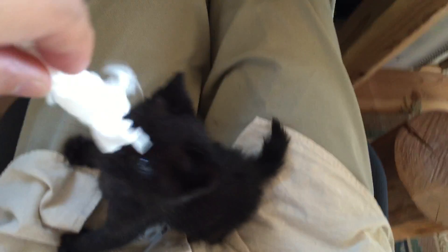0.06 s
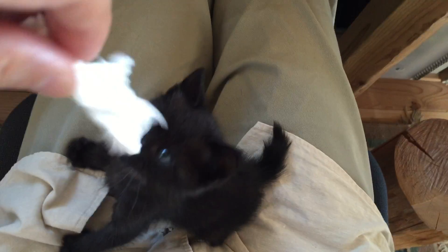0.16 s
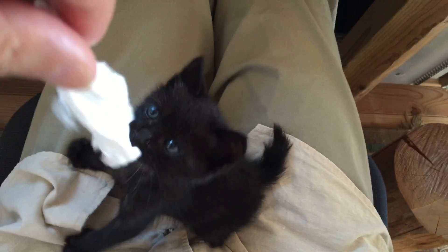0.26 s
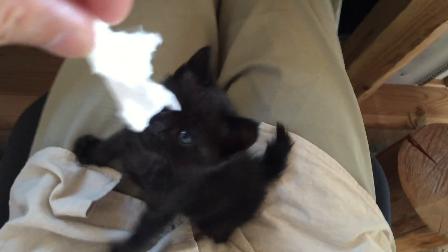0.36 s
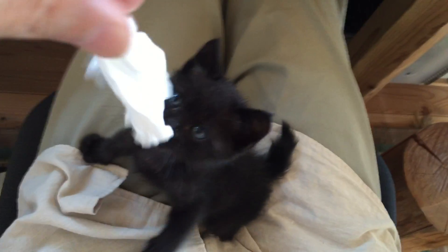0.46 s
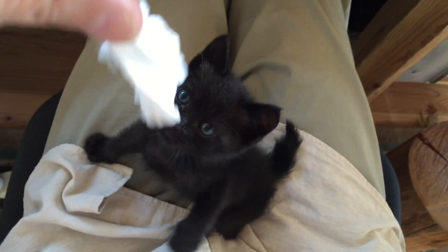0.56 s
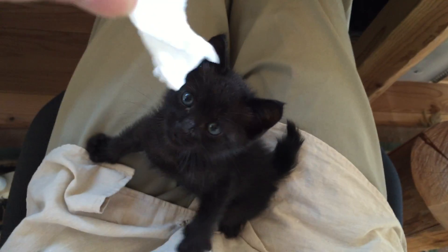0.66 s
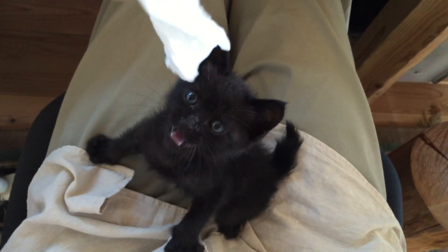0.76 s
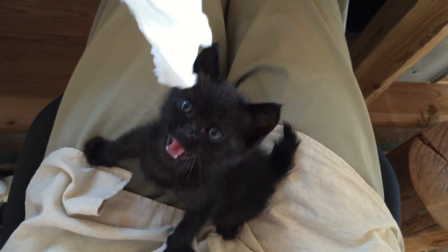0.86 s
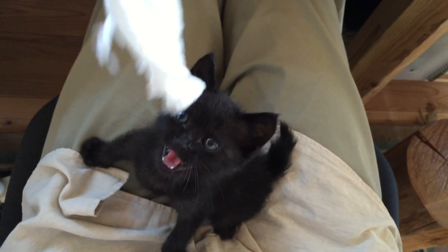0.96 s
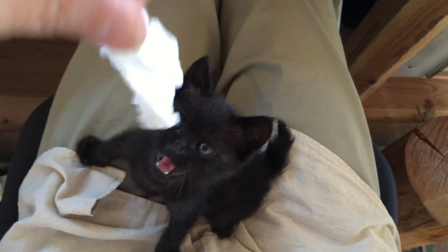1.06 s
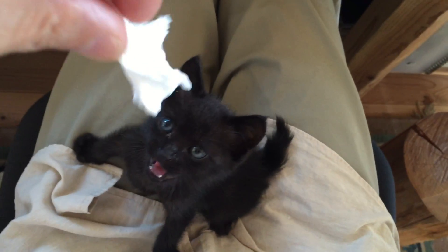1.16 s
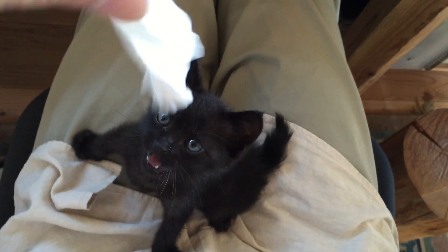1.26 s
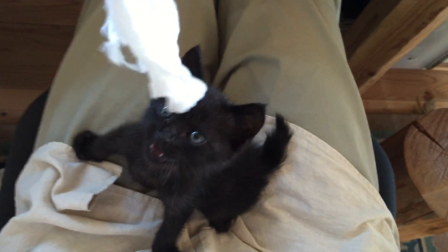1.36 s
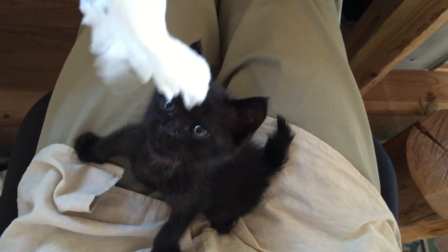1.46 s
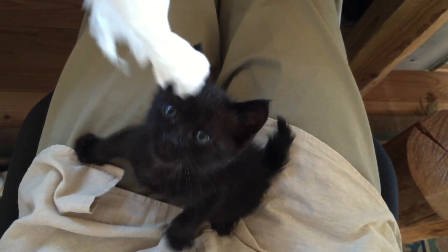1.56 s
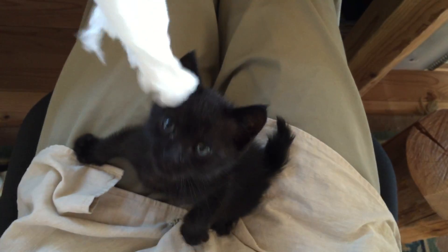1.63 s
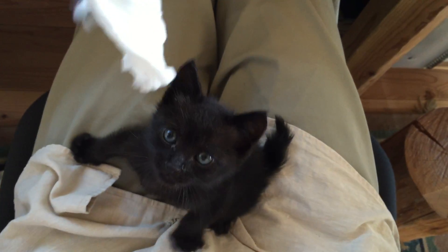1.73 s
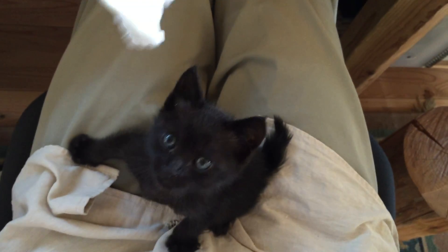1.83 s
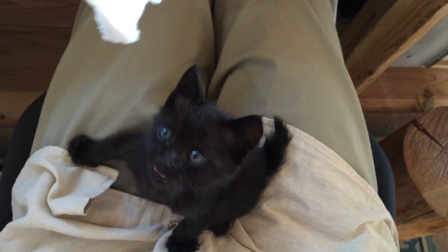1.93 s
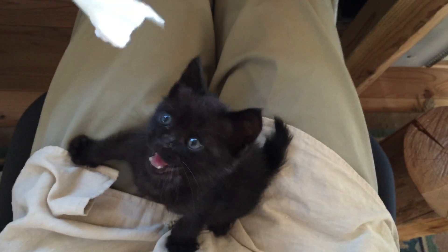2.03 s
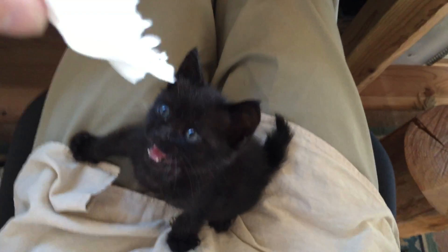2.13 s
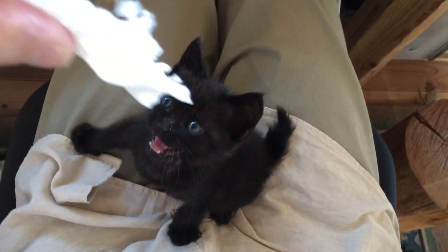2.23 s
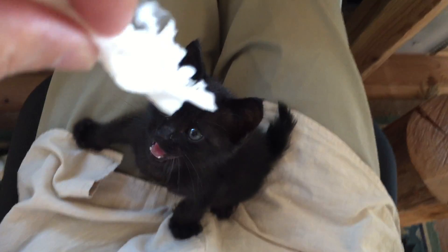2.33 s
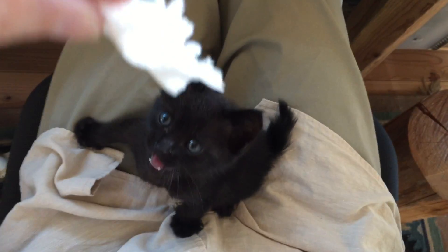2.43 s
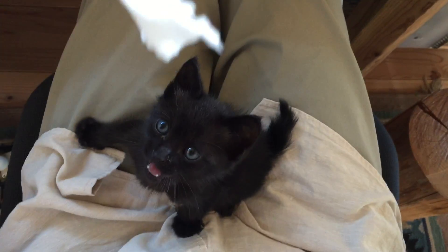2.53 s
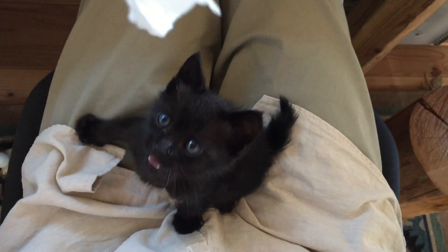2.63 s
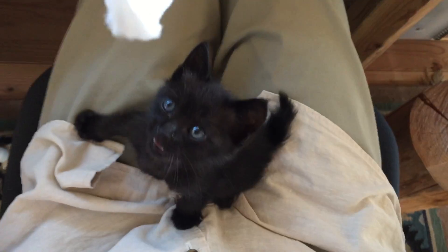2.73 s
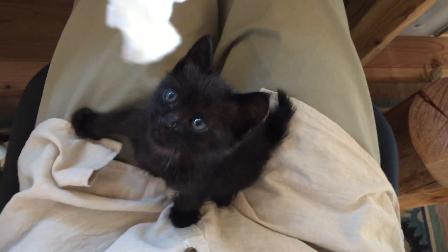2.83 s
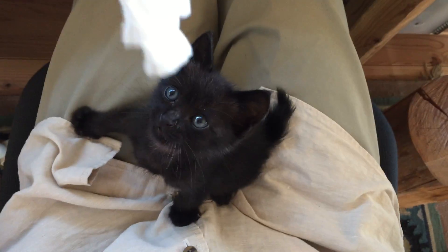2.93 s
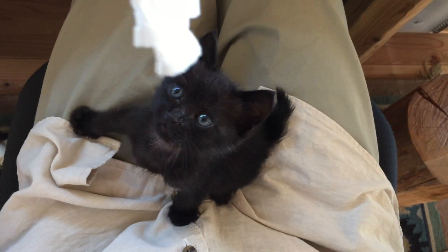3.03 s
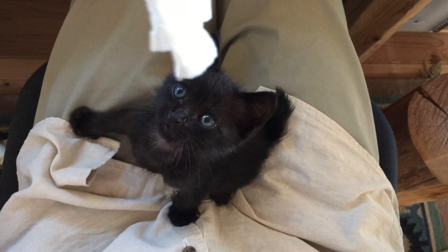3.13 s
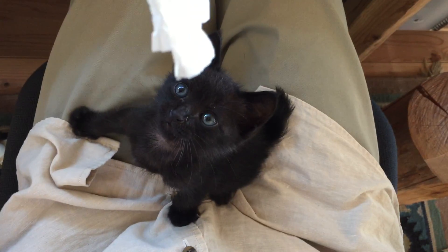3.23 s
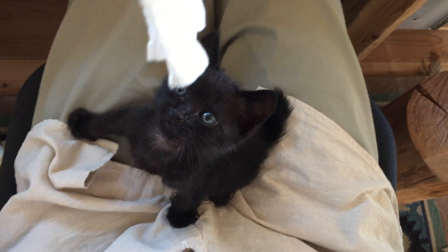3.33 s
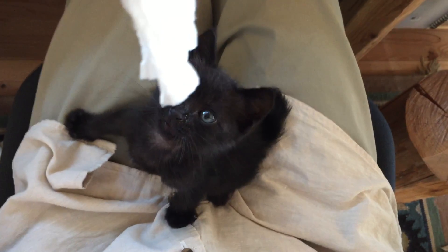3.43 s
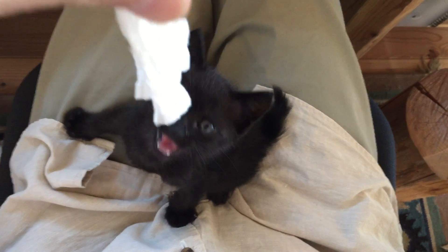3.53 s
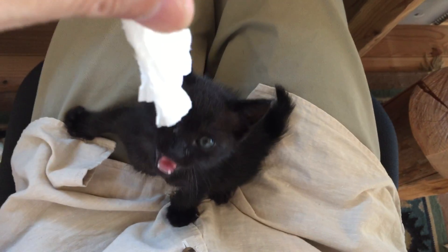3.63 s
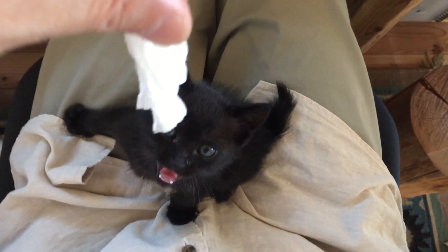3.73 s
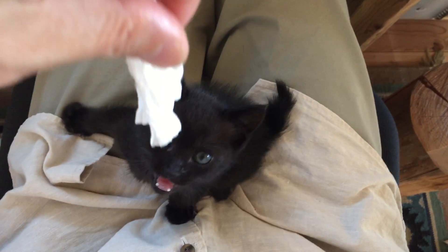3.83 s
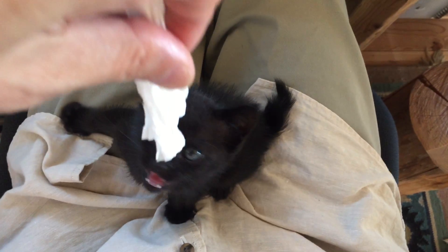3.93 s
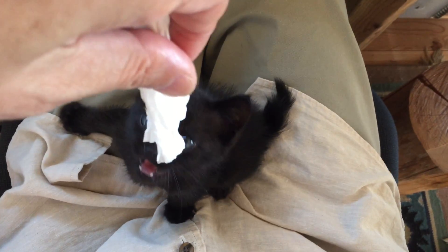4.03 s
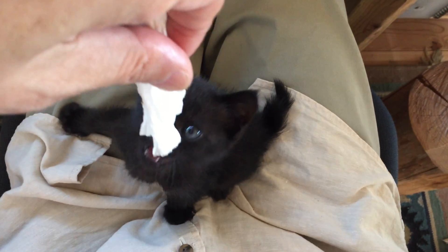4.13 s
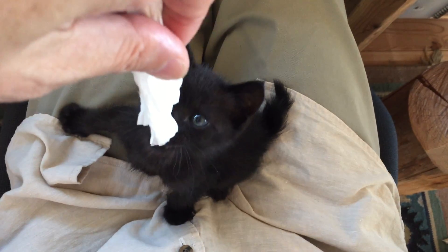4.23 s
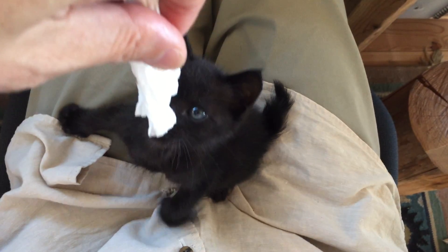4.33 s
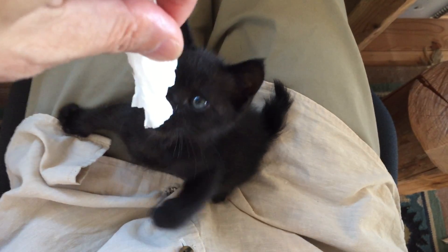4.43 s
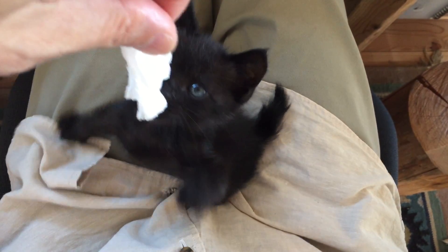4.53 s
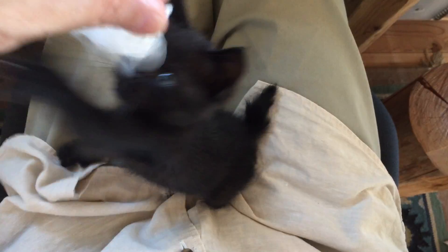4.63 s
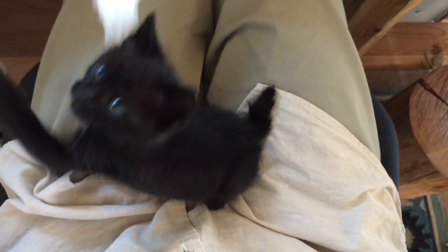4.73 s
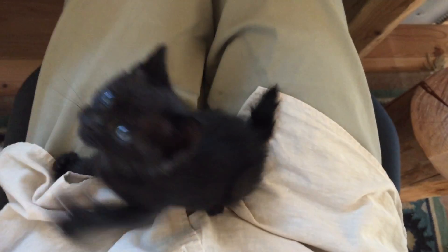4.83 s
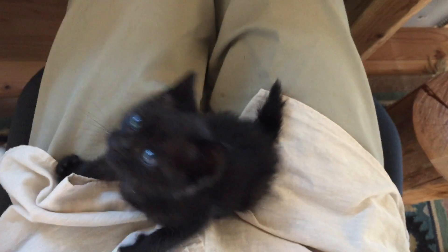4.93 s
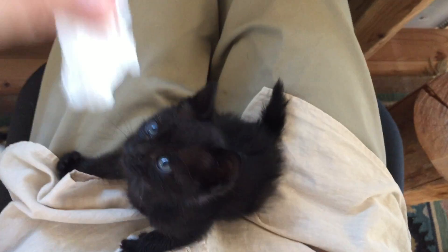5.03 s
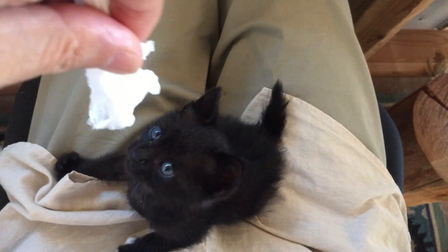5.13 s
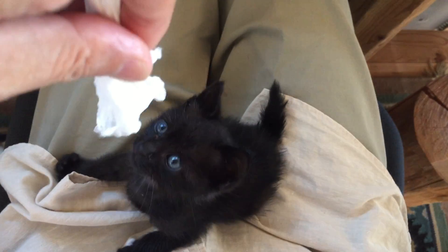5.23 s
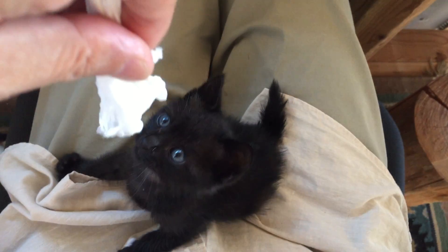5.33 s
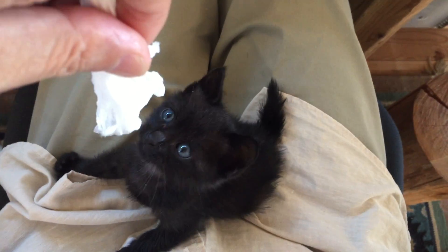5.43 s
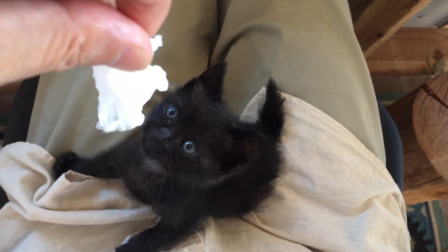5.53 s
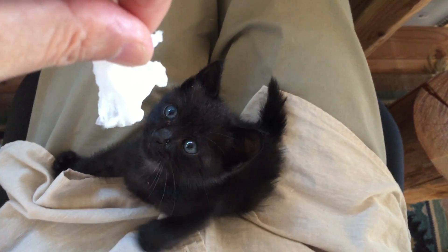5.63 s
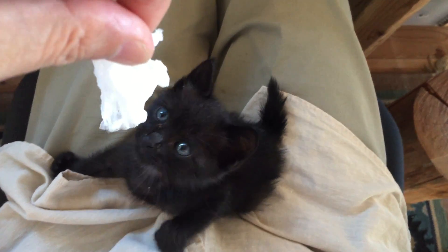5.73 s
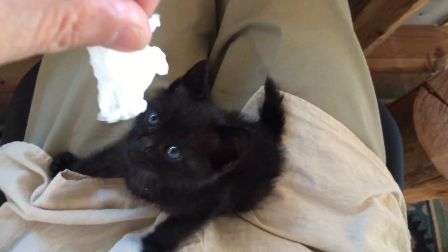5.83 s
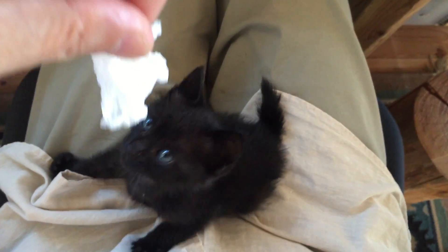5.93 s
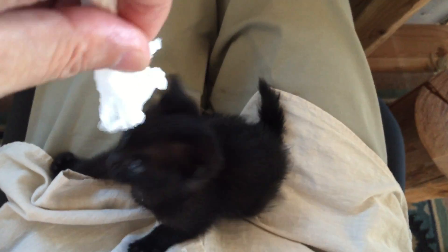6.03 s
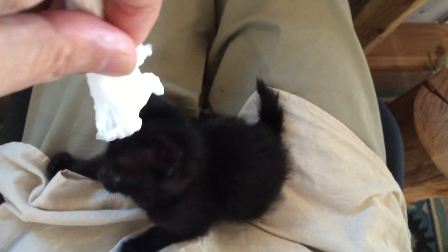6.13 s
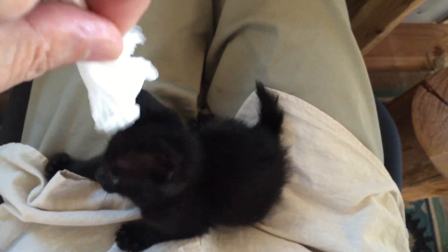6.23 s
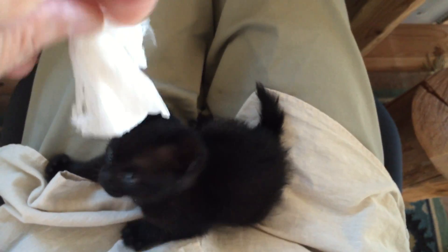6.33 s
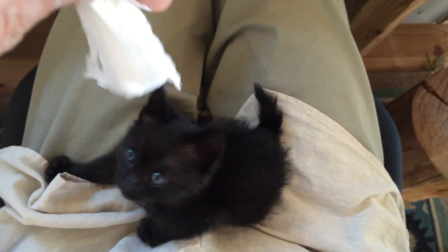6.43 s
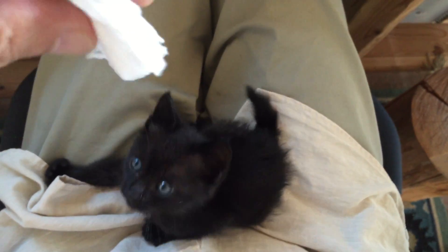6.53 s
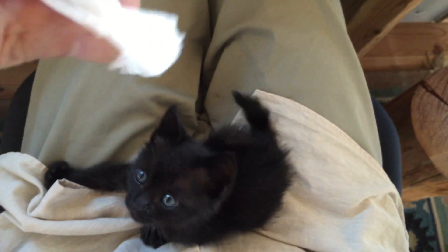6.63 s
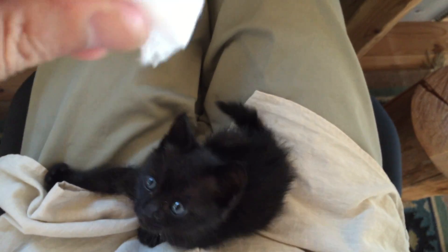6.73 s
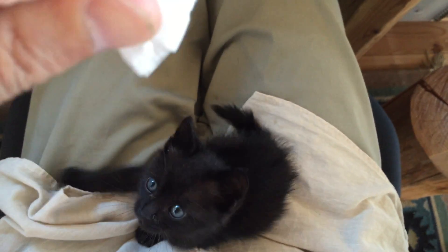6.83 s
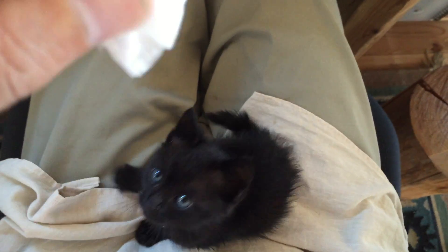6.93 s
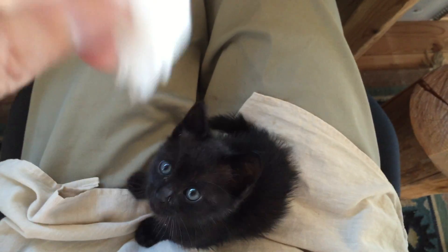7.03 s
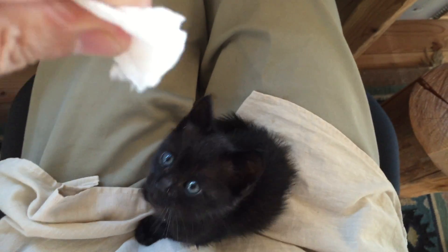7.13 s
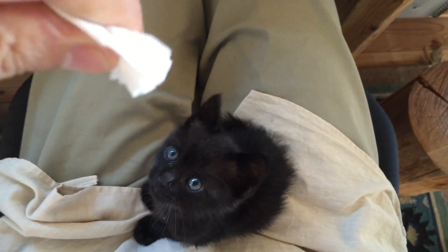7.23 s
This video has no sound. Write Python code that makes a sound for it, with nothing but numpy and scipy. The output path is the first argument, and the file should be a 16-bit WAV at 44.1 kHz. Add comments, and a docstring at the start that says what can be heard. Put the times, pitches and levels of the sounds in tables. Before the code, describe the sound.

A young kitten is heard close to the microphone in a quiet room, over soft room air and faint low hums. At about 0.8 seconds it gives a thin, high, slightly raspy mew that rises gently and drops away by 1.4. A second, slightly softer mew runs from 2.1 to 2.7 seconds. Tiny wet lip smacks come before and after these calls. At 3.6 seconds comes the loudest cry, higher and wide-mouthed, climbing, holding and sliding down to end near 4.3. A faint rustle of cloth then builds as the kitten moves on a lap, and a paw lands with a soft, dull thump at 4.7 seconds. From about 6 seconds, pads and claws lightly tap, brush and scratch on trouser fabric, with three quick snags around 6.9 seconds and a few faint scratches until about 7.3. All the movement is much quieter than the mews.

```python
"""A kitten on a lap, close to a phone in a quiet room, gives two small mews (0.8 s, 2.1 s), then a
louder, wide-mouthed cry (3.6 s). Each is vocal-fold pulses and breath, shaped by the throat and a mouth
that opens and shuts, with wet lip smacks around it. Then it scrambles after a dangled tissue: a paw
lands with a soft thump (4.7 s), and from about 6 s pads and claws tap, brush and snag on trouser cloth.
Under it all lie room air, faint hums and the rustle of the lap."""
import sys
import numpy as np
from scipy import signal
from scipy.fft import rfft, irfft, next_fast_len
from scipy.io import wavfile
from scipy.ndimage import uniform_filter1d

SR = 44100
rng = np.random.default_rng(int(sys.argv[2]) if len(sys.argv) > 2 else 0)


def int16_out(signal):
    """Quantize to a 16-bit WAV file."""
    q = np.round(np.clip(np.atleast_2d(signal).T, -1, 1) * 32767)
    wavfile.write(sys.argv[1], SR, q.astype(np.int16))


N = 320607
TIME = np.arange(N) / SR
CEILING_HZ = 15950

# The melody of each mew. Each row: time in seconds, pitch in Hz.
PITCH_1 = [(0.8, 600), (0.808, 649), (0.824, 680), (0.838, 640), (0.852, 680.5), (0.896, 673.6),
           (0.988, 720.6), (1.056, 777), (1.12, 769.8), (1.204, 801.3), (1.344, 710), (1.376, 680),
           (1.418, 551)]
PITCH_2 = [(2.135, 665.5), (2.141, 694), (2.175, 629.4), (2.233, 628.7), (2.285, 649), (2.371, 709),
           (2.407, 702), (2.455, 727.5), (2.479, 704.5), (2.583, 742.4), (2.607, 765), (2.695, 737),
           (2.713, 712), (2.735, 607), (2.738, 600)]
PITCH_3 = [(3.597, 879), (3.603, 865), (3.623, 948), (3.649, 928), (3.665, 953), (3.693, 1012),
           (3.703, 1107), (3.713, 1114), (3.741, 1134), (3.855, 1119), (3.875, 1104), (3.935, 1116),
           (4.029, 1072), (4.065, 1035), (4.113, 926), (4.217, 695), (4.235, 633), (4.245, 586),
           (4.255, 568)]
# The dynamics of each mew. Each row: time in seconds, level in dB, the treble's share in dB.
DYNAMICS_1 = [(0.795, -62, -18), (0.813, -45, -2), (0.853, -37, -6.5), (0.973, -41, -1.5),
              (1.109, -37.5, -3.5), (1.361, -42, -6), (1.409, -51.5, -7.5), (1.42, -69, -19)]
DYNAMICS_2 = [(2.119, -49, -5), (2.123, -44, -6), (2.183, -48.5, -10), (2.313, -42.5, -3),
              (2.519, -41.5, -1.5), (2.607, -40, -5.5), (2.711, -44.5, -7), (2.739, -56.5, -9),
              (2.746, -63, 0)]
DYNAMICS_3 = [(3.593, -40, -6.5), (3.613, -34, -3.5), (3.685, -30.5, 0), (3.843, -28.5, -4.5),
              (3.977, -30, -5.5), (4.043, -35, -2.5), (4.113, -32.5, -2.5), (4.137, -31, -12),
              (4.217, -39.5, -5), (4.247, -45.5, -14), (4.258, -47.5, 0)]
# The throat's colour in each mew. Each row: frequency in Hz, gain in dB.
THROAT_1 = [(600, -30), (800, -12.5), (1450, -18.5), (2100, 1), (3200, -9), (4400, -12), (5100, 0),
            (6000, -2.5), (7600, -18.5), (9400, -7.5), (11000, -22), (14000, -37), (16000, -42)]
THROAT_2 = [(600, -22.5), (780, -20.5), (1350, -19), (2000, 6.5), (3200, -21), (4400, -22.5), (5200, -4),
            (6100, 3), (7500, -15), (9200, -11), (10500, -27), (12200, -29), (16000, -48)]
THROAT_3 = [(600, -35), (750, -21.5), (1050, -16), (1450, -17.5), (2200, -6.5), (3300, -13.5), (4400, -9),
            (5000, -4.5), (5800, -2.5), (6900, -15), (7900, -13), (8800, -21), (10000, -20), (11500, -21.5),
            (13400, -36), (16000, -37.5)]
# Notches cut by the nose's side cavities. Each row: centre in Hz, half-width in Hz, gain in dB.
NOSE_NOTCHES = [(2972, 169, -14.5), (5016, 170, -16)]
# The reach of the four formants. Each row: low edge in Hz, high edge in Hz.
FORMANT_BANDS = [(450, 2800), (2800, 5100), (5100, 7300), (7300, 20000)]
# Cracks in the voice. Each row: peak time in seconds, half-length in seconds, roughness from 0 to 1.
CRACKS = [(0.834, .012, 0.73), (2.137, 0.01, 0.6), (3.703, 0.0048, 0.36), (3.74, 0.012, .1)]
# Hoarse patches. Each row: peak time and half-length in seconds, centre in Hz, dB against the voice.
RASPS = [(.862, 0.029, 4300, -13), (1.17, .09, 4350, -17.5), (2.465, .017, 8800, -18),
         (2.69, 0.042, 8840, -16), (3.68, .02, 6700, -17.5), (3.771, .05, 6200, -24.5),
         (4.115, 0.015, 6300, -14.5), (4.17, .07, 9800, -20.5)]
# Clicks. Each row: start in seconds, level in dB, centre in Hz.
LIP_SMACKS = [(.572, -68, 5500), (.81, -62.5, 1210), (1.425, -54.5, 5680), (2.894, -58.5, 4200),
              (3.006, -68.5, 4130)]
DRY_CLICKS = [(0.787, -48, 1720), (4.606, -59, 1000), (4.703, -49, 1600), (5.101, -62, 1600),
              (6.126, -55.5, 3530), (6.37, -51.5, 5960), (6.992, -60, 563)]  # short, wide clicks: a mouth click just before the first mew, then paw taps
# Strokes over the cloth. Each row: peak time in seconds, level in dB, half-length in seconds.
PAD_RUBS = [(4.722, -58.5, 0.015), (6.297, -59.5, 0.02), (6.496, -55, 0.017), (6.55, -68, 0.021)]
CLAW_SCRATCHES = [(2.16, -57.5, 0.047), (6.376, -63.5, .016), (6.586, -64.5, .026), (6.749, -56.5, 0.016),
                  (6.776, -63.5, 0.062), (6.803, -57, .011), (7.054, -63, 0.016), (7.134, -66.5, 0.051),
                  (7.255, -61.5, 0.029)]
# A claw catches a thread and snaps free. Each row: peak time in seconds, level in dB.
CLAW_SNAGS = [(6.835, -51), (6.861, -48.5), (6.889, -53.5)]
# The colours of the noise layers. Each row: frequency in Hz, relative level in dB.
BREATH_EQ = [(500, -17), (1700, -6), (2700, -21.5), (4200, -1.5), (5000, -7.5), (6500, 4.5), (8000, 6),
             (12000, 8), (16000, -2)]  # turbulence at the folds
PAD_EQ = [(530, -54), (900, -9), (1370, -10), (2850, 3), (3400, -2.5), (4260, 7), (4850, 3), (15000, -12.5)]  # a soft pad rubbing
CLAW_EQ = [(710, -11), (1200, -8.5), (2830, -6.5), (3320, -5), (3700, -7), (8630, 2.5), (13600, 1.5),
           (16000, 2.5)]  # claws over the weave
THUMP_EQ = [(59, -48.5), (100, -16), (313, 0), (732, -20.5), (1280, -13), (1660, -18), (2060, -8),
            (2850, -17), (3080, -24), (4000, -20), (5200, -49), (8800, -120)]  # a paw landing
LAP_EQ = [(18, -29.5), (30, -15), (59, -12), (148, -3), (245, -3), (463, -26), (520, -23), (1020, -14),
          (1260, -23), (3000, -27), (3900, -30.5), (6600, -120)]  # cloth and legs shifting
ROOM_TONE_EQ = [(15, -54), (25, -18.5), (53, 0.5), (137, -4), (217, -9), (285, -11.5), (489, -19.5),
                (545, -18.5), (1290, -20.5), (1400, -22), (1700, -23), (4740, -28), (6050, -28),
                (13200, -35), (16000, -37)]  # still air
# Faint tones under the last scramble. Each row: frequency in Hz, level in dB.
SCRAMBLE_RINGS = [(362, -81.5), (524, -79.5), (1010, -78)]
# Brief low hums. Each row: peak time and half-length in seconds, pitch in Hz, level in dB.
HUMS = [(0.346, 0.31, 150, -68.5), (1.16, 0.097, 133, -58), (2.13, 0.0052, 386, -55.5),
        (3.601, 0.0057, 421, -60.5), (3.637, .1, 228, -69), (4.066, 0.095, 137, -58),
        (5.618, 0.12, 224.5, -64.5), (5.857, 0.043, 224, -60), (6.912, 0.14, 246.4, -63)]
# The room's tail. Each row: frequency in Hz, seconds to fall by 60 dB.
ROOM_DECAY = [(200, 0.374), (2000, 0.59), (4500, 0.4), (9000, 0.5), (16000, 0.14)]


def mew(pitch, dynamics, throat, widest_s, shut_hz, open_hz, mouth_db, mouth_width_hz,
        low_db, low_db_per_octave, top_db, breath_db, jitter, quiver):
    """Fold pulses and breath pass the throat and a mouth that opens and shuts. Gives start and sound."""
    t = np.arange(dynamics[0][0], dynamics[-1][0], 1 / SR)
    times, *curves = np.transpose(dynamics)
    level, treble = (np.interp(t, times, curve) for curve in curves)
    rough = roughness(t)
    jaw = np.sin(np.pi / 2 * np.interp(t, [t[0], widest_s, t[-1]], [.2, 1, 0]))  # ajar, wide, shut
    hz = uniform_filter1d(np.interp(t, *np.transpose(pitch)), size=450)
    formant_db = vowel(level, treble, hz, jaw, low_db, low_db_per_octave, top_db)
    # a slow muscle quiver, and fast jitter that grows in the cracks
    hz = hz * (1 + quiver * wander(len(t), 45) + (jitter + .05 * rough) * wander(len(t), 380))
    cycles = np.cumsum(hz) / SR
    pulses = vocal_folds(hz, cycles, rough) * np.sqrt(1 - rough)
    air = breath(cycles) * (gain_of(breath_db) + rough)
    voice = throat_and_nose(pulses + air, throat)
    mouth_hz = shut_hz + (open_hz - shut_hz) * jaw
    voice = voice + gain_of(mouth_db) * resonate(voice, mouth_hz, mouth_width_hz)
    # flatten each formant band, then ride it on its own fader
    voice = sum(gain_of(db) * levelled(band(voice, *edges))
                for db, edges in zip(formant_db, FORMANT_BANDS))
    voice = voice + gain_of(level) * rasps(t, cycles)
    return t[0], voice * signal.windows.tukey(len(t), .012)


def vocal_folds(hz, cycles, rough):
    """The folds close unevenly, so upper harmonics flutter more than low ones."""
    buzz = sum(gain_of(.18 * k * wander(len(hz), 29.2)) * np.cos(2 * np.pi * k * cycles)
               * (k * hz < CEILING_HZ) for k in range(1, 27))
    alternation = 1 + (.015 + .37 * rough) * np.cos(np.pi * cycles)  # strong pulse, weak pulse
    creak = 1 + rough * np.tanh(wander(len(hz), 500))
    return unit_rms(buzz) * alternation * creak


def roughness(t):
    """The folds rattle at the onset, fray at the end and break up in each crack."""
    patches = [(t[0] + .01, .006, .97), (t[-1] - .01, .011, .38), *CRACKS]
    return np.clip(sum(amount * swell(t, s, half, half) for s, half, amount in patches), 0, 1)


def breath(cycles):
    """Air escapes in one puff per cycle of the folds."""
    puffs = .26 + np.exp(-(cycles % 1) / .34)
    return unit_rms(puffs * noise(BREATH_EQ, len(cycles))) * gain_of(3.8 * wander(len(cycles), 60))


def throat_and_nose(x, throat, size=4096):
    """Throat and nose colour the voice, ringing after each pulse and never before."""
    hz = abs(np.fft.fftfreq(size, 1 / SR))
    notches = sum(db / (1 + ((hz - centre) / half) ** 2) for centre, half, db in NOSE_NOTCHES)
    log_gain = np.log(gain_of(curve_at(throat, hz) + notches))
    ring = np.fft.ifft(np.exp(signal.hilbert(log_gain))).real
    minimum_phase = np.roll(ring[::-1], 1)[:size // 2]
    return signal.fftconvolve(x, minimum_phase)[:len(x)]


def vowel(level, treble, hz, jaw, low_db, low_db_per_octave, top_db):
    """Jaw and tongue share the level among four gently wobbling formants, low to high, in dB."""
    low = low_db + .17 * (level - level.max()) + low_db_per_octave * np.log2(hz / hz.max())
    spare_power = np.maximum(1 - gain_of(treble) ** 2 - gain_of(low - level) ** 2, .08)
    mouth = level + 10 * np.log10(spare_power)
    tilt = top_db - .5 * (1 - jaw)  # a shut mouth dulls the top
    bright = level + treble - 10 * np.log10(1 + gain_of(tilt) ** 2)
    top = level + treble + tilt
    return [db + 1.05 * wander(len(db), hz=14) for db in (low, mouth, bright, top)]


def rasps(t, cycles, width_hz=1230):
    """Hoarseness: narrow bands of turbulence throb with the folds."""
    throb = 1 + .598 * np.cos(2 * np.pi * cycles)
    air = rng.standard_normal(len(t)) * throb * gain_of(2.5 * wander(len(t), 70))
    return sum(gain_of(db) * swell(t, s, half, half)
               * unit_rms(band(air, hz - width_hz / 2, hz + width_hz / 2))
               for s, half, hz, db in RASPS if t[0] < s < t[-1])


def clicks(events, width_share, decay_cycles):
    """A burst in one resonance: narrow and longer sounds wet, wide and short sounds dry."""
    track, t = np.zeros(N), TIME[:SR // 10]
    for s, db, hz in events:
        width = width_share * hz
        edges = np.clip([hz - width / 2, hz + width / 2], 50, SR / 2 - 1)
        burst = rng.choice([-1., 1.], len(t)) * np.exp(-t * hz / decay_cycles)
        click = signal.sosfilt(signal.butter(2, edges, "band", fs=SR, output="sos"), burst)
        add(track, s, gain_of(db) * np.sqrt(SR / (2 * width)) * click)
    return track


def cloth_strokes(grain_db=2.0):
    """Pads rub and claws hiss over the trousers, grainy as they catch on the threads."""
    pad, claw = noise(PAD_EQ), noise(CLAW_EQ)
    rubs, scratches = (sum(gain_of(db) * swell(TIME, s, half, half) for s, db, half in rows)
                       for rows in (PAD_RUBS, CLAW_SCRATCHES))
    snags = sum(gain_of(db) * swell(TIME, s, rise=.0036, fall=.01) for s, db in CLAW_SNAGS)
    strokes = sum(envelope * (np.sqrt(1 - claw_share) * pad + np.sqrt(claw_share) * claw)
                  for envelope, claw_share in ((rubs, .17), (scratches, .88), (snags, 1)))
    return strokes * unit_rms(gain_of(grain_db * wander(N, 900)))


def paw_thump(ring_hz=285, decay_s=.01):
    """A paw scuffs down on the lap, which answers with a short dull ring."""
    thump = gain_of(-51.5) * levelled(noise(THUMP_EQ)) * swell(TIME, 4.724, rise=.014, fall=.013)
    t = TIME[:SR // 10]
    add(thump, 4.726, -gain_of(-52) * np.sin(2 * np.pi * ring_hz * t) * np.exp(-t / decay_s))
    return thump


def lap_rustle(restless_s=4.38, still_db=-81.5, restless_db=-74.5, db_per_s=2.5):
    """Cloth and legs shift, barely at first, then building as the kitten scrambles."""
    db = np.where(TIME < restless_s, still_db, restless_db + db_per_s * (TIME - restless_s))
    return noise(LAP_EQ) * gain_of(uniform_filter1d(db, size=8000) + 1.67 * wander(N, 13))


def scramble_rings(width_hz=45):
    """Faint wavering tones swell and fade with the last scramble."""
    rings = sum(gain_of(db) * unit_rms(wander(N, width_hz / 2) * np.sin(2 * np.pi * hz * TIME))
                for hz, db in SCRAMBLE_RINGS)
    return rings * swell(TIME, 6.67, rise=.33, fall=.7)


def room_reverb(x, near_db=-21, near_decay_s=.019, tail_db=-24):
    """Quick reflections off hand, lap and floor, then a weak tail that dies band by band."""
    t = TIME[:SR // 2]
    bounces = rng.choice([-1., 1.], len(t)) * (rng.random(len(t)) < 3000 / SR) * (t > .0012)
    near = bounces * np.exp(-t / near_decay_s)
    hz, s, spectra = signal.stft(bounces * (t > .008), SR, nperseg=256)
    fade = gain_of(-60 * s / curve_at(ROOM_DECAY, hz)[:, None])
    tail = signal.istft(spectra * fade, SR, nperseg=256)[1][:len(t)]
    echoes = sum(gain_of(db) * part / np.linalg.norm(part)
                 for db, part in ((near_db, near), (tail_db, tail)))
    return x + signal.fftconvolve(x, echoes)[:N]


def room_tone(air_db=-67.5):
    """A bed of still air in which faint low hums come and go."""
    hums = sum(gain_of(db) * swell(TIME, s, half, half) * np.sin(2 * np.pi * hz * TIME)
               for s, half, hz, db in HUMS)
    return gain_of(air_db) * noise(ROOM_TONE_EQ) + hums


def gain_of(db):
    """Decibels to amplitude."""
    return 10 ** (np.asarray(db) / 20)


def unit_rms(x):
    """Scales a whole sound to rms 1."""
    return x / np.sqrt(np.mean(x ** 2) + 1e-20)


def levelled(x):
    """Holds a sound at rms 1 from moment to moment."""
    return x / np.sqrt(abs(uniform_filter1d(x ** 2, size=700)) + 1e-14)


def curve_at(points, hz):
    """Reads a curve on a log-frequency axis."""
    knots_hz, values = np.transpose(points)
    return np.interp(np.log(hz + 1), np.log(knots_hz), values)


def add(mix, s, sound):
    """Lays a sound into the mix at s seconds."""
    part = mix[round(s * SR):][:len(sound)]
    part += sound[:len(part)]


def noise(eq, size=N):
    """Noise of rms 1, coloured by an EQ curve."""
    n = next_fast_len(size, True)
    colour = gain_of(curve_at(eq, np.fft.rfftfreq(n, 1 / SR)))
    return unit_rms(irfft(rfft(rng.standard_normal(n)) * colour, n)[:size])


def wander(size, hz):
    """Random drift of rms 1, rolled off above hz."""
    n = next_fast_len(size, True)
    rolloff = 1 + (np.fft.rfftfreq(n, 1 / SR) / hz) ** 4
    return unit_rms(irfft(rfft(rng.standard_normal(n)) / rolloff, n)[:size])


def swell(t, s, rise, fall):
    """A bell-shaped envelope that peaks at s; all in seconds."""
    return np.exp(-((t - s) / np.where(t < s, rise, fall)) ** 2)


def resonate(x, hz, width_hz):
    """A unity-gain resonance swept along the curve hz."""
    carrier = np.exp(2j * np.pi * np.cumsum(hz) / SR)
    pole = np.exp(-np.pi * width_hz / SR)
    return 2 * (carrier * signal.lfilter([1 - pole], [1, -pole], x / carrier + 1e-18)).real


def band(x, low_hz, high_hz):
    """Keeps one band, with steep edges and no delay."""
    n = next_fast_len(2 * len(x), True)
    hz = np.fft.rfftfreq(n, 1 / SR) + 1
    return irfft(rfft(x, n) / (1 + (low_hz / hz) ** 40) / (1 + (hz / high_hz) ** 40), n)[:len(x)]


def scene():
    """Kitten, cloth and room, heard by one microphone in both channels."""
    kitten = np.zeros(N)
    add(kitten, *mew(PITCH_1, DYNAMICS_1, THROAT_1, widest_s=1.09, shut_hz=3580, open_hz=4540,
                     mouth_db=11, mouth_width_hz=410, low_db=-53.5, low_db_per_octave=1, top_db=-8,
                     breath_db=-18, jitter=.0031, quiver=.0017))
    add(kitten, *mew(PITCH_2, DYNAMICS_2, THROAT_2, widest_s=2.34, shut_hz=3540, open_hz=4930,
                     mouth_db=12.5, mouth_width_hz=730, low_db=-54, low_db_per_octave=5.5, top_db=-10,
                     breath_db=-23, jitter=.0038, quiver=.002))
    add(kitten, *mew(PITCH_3, DYNAMICS_3, THROAT_3, widest_s=3.68, shut_hz=3850, open_hz=4650,
                     mouth_db=5, mouth_width_hz=580, low_db=-40, low_db_per_octave=19, top_db=-10.5,
                     breath_db=-21, jitter=.0022, quiver=.001))
    smacks = clicks(LIP_SMACKS, width_share=.32, decay_cycles=26)
    dry_clicks = clicks(DRY_CLICKS, width_share=.9, decay_cycles=4.3)
    foreground = room_reverb(kitten + smacks + dry_clicks + cloth_strokes() + paw_thump())
    mono = foreground + scramble_rings() + lap_rustle() + room_tone()
    return np.array([mono, mono])


def record(dry):
    """The phone cuts the deepest rumble and the highest treble."""
    dry = signal.sosfilt(signal.butter(4, 31, "high", fs=SR, output="sos"), dry)
    lowpass = signal.firwin(511, CEILING_HZ, window=("kaiser", 9), fs=SR)
    return signal.oaconvolve(dry, lowpass[None], "same")


dry = scene()
out = record(dry)
int16_out(out)
```